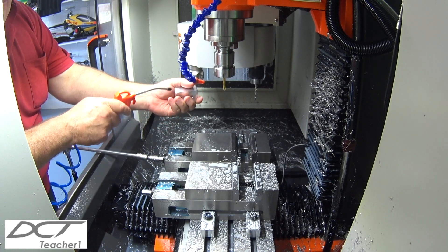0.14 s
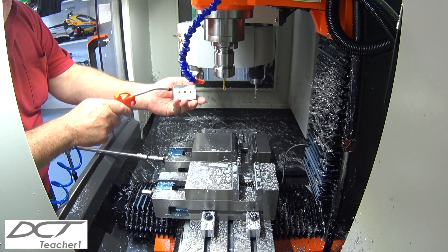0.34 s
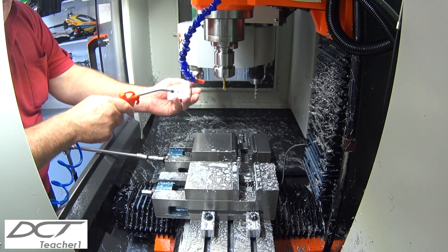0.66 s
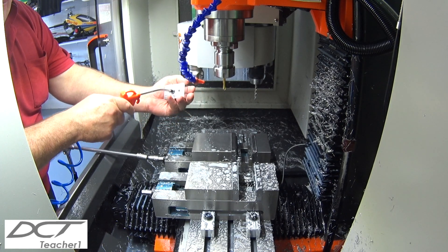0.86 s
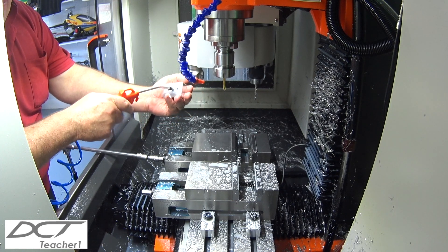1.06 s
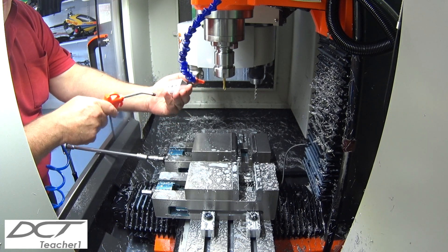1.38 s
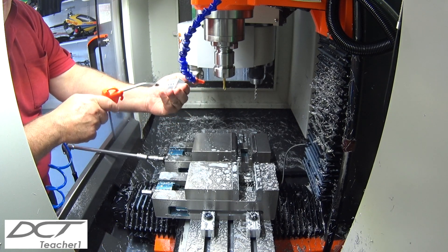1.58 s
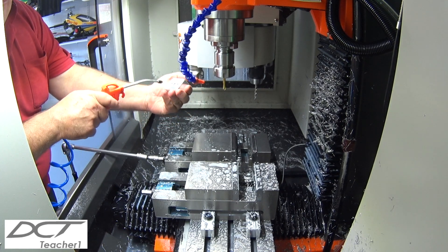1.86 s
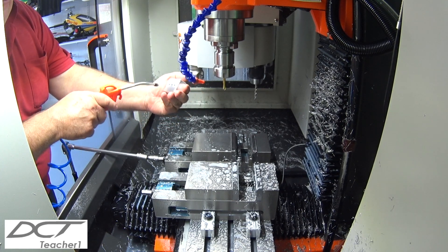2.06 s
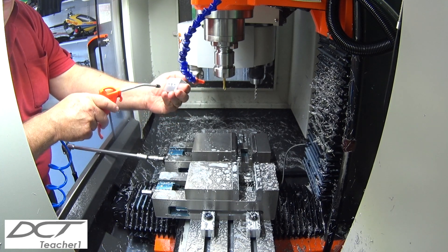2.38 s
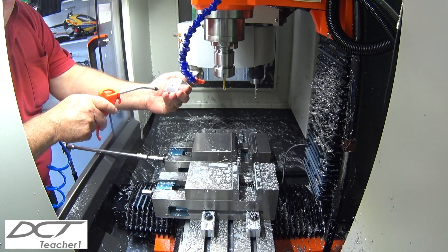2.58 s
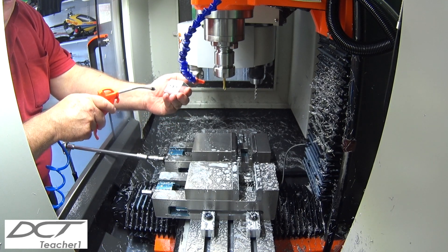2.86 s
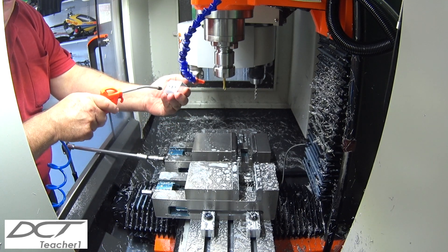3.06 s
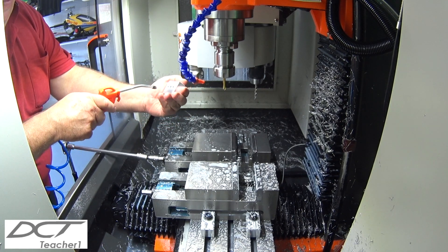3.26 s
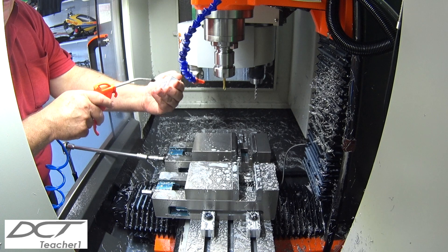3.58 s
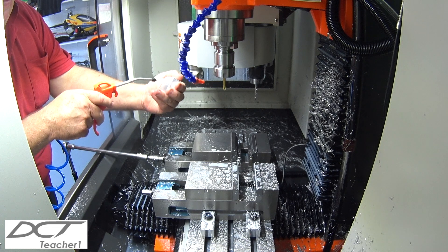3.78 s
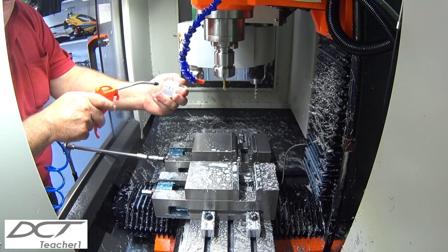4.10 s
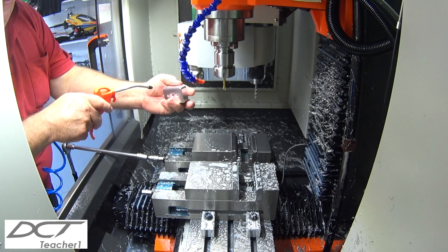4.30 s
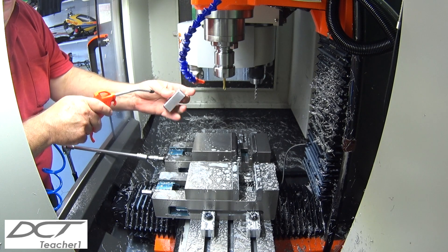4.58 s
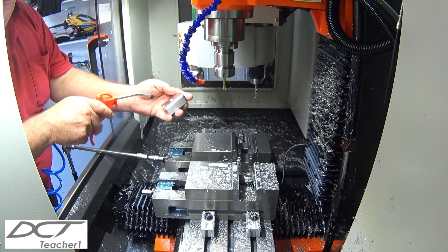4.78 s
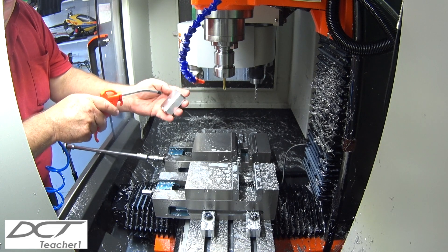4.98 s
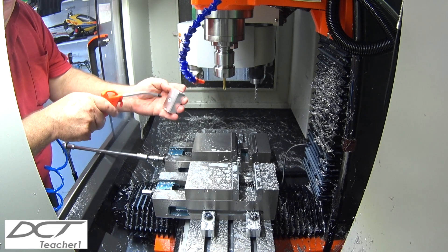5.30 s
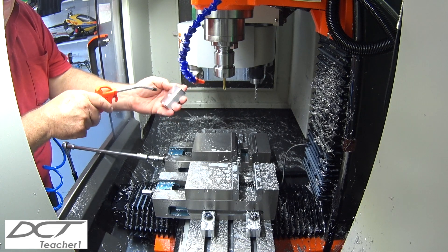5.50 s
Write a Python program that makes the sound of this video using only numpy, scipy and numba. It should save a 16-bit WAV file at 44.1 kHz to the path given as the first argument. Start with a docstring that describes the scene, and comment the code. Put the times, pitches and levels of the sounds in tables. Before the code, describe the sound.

A compressed-air gun blows off a small drilled metal part in one long, bright hiss, broken by quick high whistles and low puffs of wind on the microphone. It cuts off, and the hum of an idle milling machine swells up. A brief burst follows, then a longer pause and a final hiss. The air sounds close, with a short ring from the steel cabinet and workshop.

```python
"""Hissing, whistling blasts of air, one long and two short, over the hum of an idle milling machine.
A blow gun clears a small drilled part in the machine's open door. The turbulent jet hisses, sizzles on
edges, whistles when it catches a bore and buffets the hand; the steel cabinet and the shop ring briefly.
Motors and fans make the hum. A cased camera cuts its gain in each blast, then lets the hum swell back."""
import sys
import numpy as np
from scipy import signal
from scipy.fft import rfft, irfft
from scipy.io import wavfile
from scipy.ndimage import uniform_filter1d
from numba import njit

SR = 44100
rng = np.random.default_rng(int(sys.argv[2]) if len(sys.argv) > 2 else 0)


def persist_wave(psi):
    """Save psi, clipped to +-1, as 16-bit WAV."""
    counts = np.round(np.clip(psi, -1, 1) * 32767).astype(np.int16)
    wavfile.write(sys.argv[1], SR, np.atleast_2d(counts).T)


N = 249165
TIME_S = np.arange(N) / SR
FREQS_HZ = np.maximum(np.arange(N // 2 + 1) * SR / N, 1)

# Trigger pulls. Each row: valve opens, starts to close, closing time, all in seconds.
PULLS = [(-.1, 2.185, .03), (3.018, 3.33, .035), (5.031, 5.8, .03)]
# Turning of the part, one list per pull. Each row: time in seconds, then in relative dB hiss, sizzle,
# spray against sizzle, palm ring against hiss.
TURNING = [
    [(0, -27, -34, -7, -11), (.3, -23.5, -28.5, -8.5, -11.5), (.34, -25.5, -27, -9.5, -11),
     (.45, -30.5, -27, -12, -5), (.64, -28, -23, -8.5, -10.5), (.88, -27, -26.5, -4, -10.5),
     (1.07, -29, -27.5, -3.5, -8), (1.2, -29.5, -30, -9.5, -5.5), (1.47, -28.5, -28, -10.5, -2.5),
     (1.85, -27.5, -32.5, -12, -7.5), (1.97, -29, -30.5, -12.5, -3.5), (2.18, -29.5, -28, -18, -7.5)],
    [(3.03, -33, -37, -19.5, -8.5), (3.06, -34, -36.5, -13.5, 0), (3.13, -34.5, -24.5, -12.5, -3.5),
     (3.22, -27, -26.5, -19, -9), (3.33, -27.5, -30, -14, -7)],
    [(5.04, -29.5, -37, -11, -17), (5.2, -26.5, -27, -7, -10.5), (5.3, -29, -30.5, -7.5, -13),
     (5.44, -22, -31, -8.5, -11.5), (5.65, -16.5, -24, -6.5, -8.5)],
]
# Jet crossing a hole. Each row: start and end in seconds, first and last pitch in Hz, depth 0-1,
# then ring, buffeting and microphone thump in relative dB.
CROSSINGS = [ (.205, 0.262, 5250, 5250, 0.08, -26, -49.5, -68),
             (.312, 0.342, 5200, 5290, 0.74, -16, -40.5, -37.5),
             (0.355, 0.397, 5290, 5200, 0.12, -21, -43, -48.5),
             (0.464, 0.548, 5300, 5300, 0, -21.5, -50.5, -60.5),
             (.65, 0.721, 5336, 5240, 0.74, -18, -43.5, -44),
             (0.719, 0.779, 5220, 5115, 1, -14.5, -46, -43),
             (.785, 0.852, 5158, 5070, 0.82, -16.5, -50.5, -56.5),
             (1.095, 1.12, 5120, 5330, 0.8, -14, -47, -44.5),
             (1.217, 1.266, 5255, 5010, 0.6, -17, -48, -61),
             (1.271, 1.33, 5330, 5280, 0.6, -17, -50, -47.5),
             (1.38, 1.413, 5285, 5220, .45, -20, -47.5, -60.5),
             (1.49, 1.512, 5250, 5220, 0.5, -19.5, -45, -56),
             (1.597, 1.639, 5120, 5160, 0.33, -21.5, -51, -68.5),
             (1.748, 1.796, 5380, 5220, .45, -20.5, -47, -52),
             (1.877, 1.932, 5280, 5150, 0.46, -22, -47, -51),
             (2.006, 2.065, 5280, 5170, 0.56, -19, -44.5, -44.5),
             (2.105, 2.185, 5257, 5080, .25, -17.5, -43.5, -47),
             (3.014, 3.118, 5086, 5370, 0.41, -23, -55.5, -57),
             (3.19, 3.293, 5190, 5160, 0.33, -21, -43.5, -49),
             (3.305, 3.363, 5150, 5170, 0.08, -20.5, -53.5, -58),
             (5.195, 5.234, 5020, 4860, 0.2, -27, -47, -65), ]
# Jet grazing an edge. Each row: centre and half length in seconds, sizzle lift and buffeting in dB.
GRAZES = [(.585, 0.03, 6, -39.5), (0.638, .02, 0.5, -54), (1.32, 0.0069, 11, -41.5),
          (1.643, 0.017, 8, -58.5), (3.141, 0.045, 0, -49.5), (5.294, 0.038, 4.5, -50),
          (5.55, 0.016, 7, -58)]
# Jet slipping past the part. Each row: centre and half length in seconds, level change in dB.
SLIPS = [(0.418, .016, -2), (1.126, 0.022, -11.5), (1.693, 0.023, -7)]
# Ring of the camera case. Each row: time in seconds, level against the hiss in dB.
CASE_RING_DB = [(0, -18), (.3, -17.5), (.65, -17), (1, -18), (1.47, -17.5), (2.18, -23), (3.03, -19),
                (3.33, -25), (5.05, -17.5), (5.25, -21), (5.65, -17.5)]
# Motor tones; the lowest two beat at 8 Hz. Each row: frequency in Hz, level in dB.
MOTOR_TONES = [(91.7, -53), (99.7, -55.5), (142.6, -53.5), (168, -74), (199.4, -60), (211, -67), (242, -64),
               (253, -61), (438, -69), (618, -68.5), (698, -69), (717, -77), (817.5, -59)]
# Fan noise. Each row: time in seconds, level in dB.
FAN_LEVEL_DB = [(0, -51), (3.6, -47), (4.15, -48), (4.3, -45.5), (5.65, -48)]
# Noise spectra. Each row: frequency in Hz, relative density in dB.
HISS_SPECTRUM = [(500, -34.5), (1050, -25), (1500, -21), (1850, -12), (2250, -20), (2600, 0.5), (3300, 0),
                 (4200, 0.5), (4750, 2.5), (5400, -1.5), (6200, -27), (8000, -39)]
PALM_SPECTRUM = [(1200, -22), (1700, -19.5), (2150, 1.5), (2450, 4), (2750, -6.5), (3800, -48)]
SIZZLE_SPECTRUM = [(1200, -42.5), (1900, -15.5), (3000, -22), (4200, -1), (4800, 5), (5300, -5.5),
                   (5900, 4), (6600, -1), (7500, -15), (8500, -30), (11000, -38.5)]
SPRAY_SPECTRUM = [(5500, -18.5), (7300, 4), (8300, 3.5), (9000, -5), (9800, -9), (11000, -8.5)]
BUFFET_SPECTRUM = [(20, -15), (60, -8.5), (130, 4), (300, 4), (550, 3), (950, 0.5), (1500, -3), (3000, -39)]
THUMP_SPECTRUM = [(20, -13), (45, -8), (80, -0.5), (150, -6.5), (260, -4.5), (500, -33), (1200, -46)]
FAN_SPECTRUM = [(25, -21), (75, -5), (110, -11.5), (200, -3), (320, -6.5), (500, -21), (720, -13),
                (1050, -20), (1700, -15.5), (2200, -16.5), (3000, -17.5), (5000, -18), (6500, -33),
                (8500, -44), (11000, -51.5)]
# Resonances. Each row: centre in Hz, width in Hz, lift in dB.
PALM_MODES = [(2424.5, 82, 10.5)]
CASE_MODES = [(1240, 270, 10), (2800, 150, 2), (3900, 200, 2)]
PANEL_MODES = [(140.5, 30, 15.3), (237.4, 22, 10.2), (1300, 420, 7.3), (2620, 370, 7.5), (3840, 270, 5.9)]
# Stereo width of the near jet and the far machine. Each row: frequency in Hz, side gain in dB.
JET_WIDTH = [(60, -6), (200, -8.5), (550, -1.5), (1100, -1), (1900, -8), (3400, -8.5), (4500, -28),
             (5400, -22), (6500, -8), (10000, -9.5)]
HUM_WIDTH = [(60, -29.5), (150, -21), (340, -14), (600, -4.5), (820, -1.5), (1100, -6), (1900, -8.5),
             (3400, -10), (6000, -33), (10000, 5.5)]


def jet(in_hole, flutter_db=1.65, hole_db=-11, case_hole_db=-8, palm_hole_db=-6.5):
    """Turbulent hiss, weaker over a hole; stray air rings the palm's hollow and the camera case."""
    level_db, _, _, palm_db = curves(*TURNING)
    case_db, = curves(CASE_RING_DB)
    hiss = noise(HISS_SPECTRUM, CASE_MODES) * undb(flutter_db * walk(70))
    case = band(centre_hz=1355, width_hz=150) * undb(case_db + case_hole_db * in_hole + 2 * walk(30))
    palm = noise(PALM_SPECTRUM, PALM_MODES) * undb(palm_db - .5 + palm_hole_db * in_hole)
    return (hiss + case + palm) * undb(level_db + hole_db * in_hole)


def edges(in_hole, flutter_db=1.74, hole_db=-9):
    """Air split by sharp edges sizzles, louder at a graze, weaker in a deep crossing."""
    _, level_db, spray_db, _ = curves(*TURNING)
    graze_db = sum(lift_db * swell(centre_s, half_s) for centre_s, half_s, lift_db, _ in GRAZES)
    sizzle = noise(SIZZLE_SPECTRUM) * undb(1 + graze_db)
    spray = noise(SPRAY_SPECTRUM) * undb(spray_db)
    return (sizzle + spray) * undb(level_db + hole_db * in_hole ** 2 + flutter_db * walk(70))


def bores(in_hole, centre_hz=5190, width_hz=640):
    """Turbulence rings the drilled holes: faintly from stray air, loudly in a shallow crossing."""
    _, sizzle_db, _, _ = curves(*TURNING)
    crossed = sum(undb(ring_db) * np.sqrt(1 - depth) * inside(start_s, end_s)
                  for start_s, end_s, _, _, depth, ring_db, *_ in CROSSINGS)
    stray = undb(sizzle_db - 1) * (1 - in_hole)
    return band(centre_hz, width_hz) * np.hypot(crossed, stray)


def whistles(octave_db=-36):
    """Edge tones bend faster as the jet slides off a hole; the deeper the crossing, the purer."""
    wobble = .03 * walk(400)
    flutter_db = walk(120)
    drift = .004 * walk(90)
    out = np.zeros(N)
    for start_s, end_s, first_hz, last_hz, depth, ring_db, *_ in CROSSINGS:
        gate = inside(start_s, end_s)
        on = gate > 0
        progress = np.interp(TIME_S[on], [start_s, end_s], [0, 1])
        pitch_hz = first_hz + (last_hz - first_hz) * progress ** 2
        pitch_hz *= 1 + (1 - depth) * wobble[on] + drift[on]
        phase = 2 * np.pi * np.cumsum(pitch_hz) / SR
        tone = np.sin(phase) + undb(octave_db) * np.sin(2 * phase)
        out[on] += undb(ring_db) * np.sqrt(depth) * gate[on] * tone
    return np.sqrt(2) * out * undb(flutter_db)


def valve(opening_s=.018):
    """Air flow 0-1: snaps open, closes more slowly."""
    return sum(np.clip((TIME_S - on_s) / opening_s, 0, 1) ** 3
               * np.clip(1 - (TIME_S - off_s) / closing_s, 0, 1) for on_s, off_s, closing_s in PULLS)


def hole_share(slide_share=.71):
    """Share 0-1 of the jet that goes down a hole; slow crossings fade slowly."""
    shares = (depth * inside(start_s, end_s, slide_share * (end_s - start_s))
              for start_s, end_s, _, _, depth, *_ in CROSSINGS)
    return np.clip(sum(shares), 0, 1)


def striking(rim_lift_db=1.5, lead_s=.015):
    """Relative force on the part: up on the rim before each hole, down when the jet slips past."""
    rim_db = rim_lift_db * sum(swell(start_s - lead_s, half_s=.018) for start_s, *_ in CROSSINGS)
    slip_db = sum(db * swell(centre_s, half_s) for centre_s, half_s, db in SLIPS)
    return undb(rim_db + slip_db)


def buffet(steady_db=-62, flutter_db=2):
    """The hand sheds low eddies as air comes through a hole or round an edge; mid and side."""
    through = sum(undb(db) * inside(start_s, end_s) for start_s, end_s, *_, db, _ in CROSSINGS)
    around = sum(undb(db) * swell(centre_s, half_s) for centre_s, half_s, _, db in GRAZES)
    eddies = np.array([noise(BUFFET_SPECTRUM) for _ in range(2)])
    return eddies * np.hypot(undb(steady_db), through + around) * undb(flutter_db * walk(60))


def gusts(travel_s=.006, graze_db=-6):
    """Crossings and grazes send deep puffs of wind to the microphone, alike at both ports."""
    from_holes = sum(undb(db) * swell((start_s + end_s) / 2 + travel_s, (end_s - start_s) / 2)
                     for start_s, end_s, *_, db in CROSSINGS)
    from_edges = sum(undb(db + graze_db) * swell(centre_s, half_s) for centre_s, half_s, _, db in GRAZES)
    return noise(THUMP_SPECTRUM) * (from_holes + from_edges)


def cabinet(x, steel_t60_s=.13, steel_db=-4, shop_t60_s=.5, shop_db=-12, shop_cutoff_hz=6500):
    """Direct sound, quick steel cabinet reflections and the shop's longer, duller ring; mid and side."""
    t_s, out = TIME_S[:SR], []
    lowpass = signal.butter(2, shop_cutoff_hz, fs=SR, output="sos")
    for direct in (1, 0):  # no direct sound in the side
        steel, shop = (rng.standard_normal(SR) * undb(-60 * t_s / t60_s) * (t_s > .002)
                       for t60_s in (steel_t60_s, shop_t60_s))
        shop = signal.sosfilt(lowpass, shop / np.linalg.norm(shop))
        response = undb(steel_db) * steel / np.linalg.norm(steel) + undb(shop_db) * shop
        response[0] = direct
        out.append(signal.fftconvolve(x, response / np.linalg.norm(response))[:N])
    return np.array(out)


def machine(drift_hz=.2, swell_db=.64):
    """Motor tones over fan noise that booms in the panels; mid and side."""
    fan_db, = curves(FAN_LEVEL_DB)
    fans = np.array([noise(FAN_SPECTRUM, PANEL_MODES + CASE_MODES) for _ in range(2)])
    fans *= undb(fan_db + swell_db * walk(12))
    motors = np.zeros((2, N))
    for hz, db in MOTOR_TONES:
        cycles = np.cumsum(hz + drift_hz * walk(4.31)) / SR
        offsets = rng.random((2, 1))  # standing waves: mid and side differ in phase
        motors += undb(db) * np.sin(2 * np.pi * (cycles + offsets))
    return fans + np.sqrt(2) * motors


def ports(mid, side, width, left_db=-.5):
    """Left and right at two closely spaced microphone ports."""
    side = colour(side, width)
    return np.array([(mid + side) * undb(left_db / 2), (mid - side) * undb(-left_db / 2)])


def undb(db):
    """Decibels to gain."""
    return 10 ** (np.asarray(db) / 20)


def unit(x):
    """Scale to rms 1."""
    return x / np.sqrt(np.mean(x ** 2))


def curves(*tables):
    """Each column interpolated over the times in the first."""
    times_s, *columns = np.vstack(tables).T
    return [np.interp(TIME_S, times_s, column) for column in columns]


def inside(start_s, end_s, slide_s=.012):
    """Gate 0-1 of one crossing: slides in, holds, slides out."""
    return np.clip(np.minimum(TIME_S - start_s, end_s - TIME_S) / slide_s + .5, 0, 1)


def swell(centre_s, half_s):
    """Bell curve, 1 at its centre."""
    return np.exp(-((TIME_S - centre_s) / half_s) ** 2)


def walk(rate_hz):
    """Smooth random wander of rms 1."""
    step = max(int(SR / rate_hz), 1)
    held = np.repeat(rng.standard_normal(N // step + 1), step)[:N]
    return unit(uniform_filter1d(uniform_filter1d(held, step), step))


def colour(x, spectrum, modes=()):
    """Filter by a smooth spectrum plus resonant humps."""
    hz, db = np.transpose(spectrum)
    gain_db = np.interp(np.log(FREQS_HZ), np.log(hz), db)
    for centre_hz, width_hz, lift_db in modes:
        gain_db += lift_db / (1 + (2 * (FREQS_HZ - centre_hz) / width_hz) ** 2)
    return irfft(rfft(x) * undb(gain_db), N)


def noise(spectrum, modes=()):
    """Coloured noise of rms 1."""
    return unit(colour(rng.standard_normal(N), spectrum, modes))


def band(centre_hz, width_hz):
    """Noise of rms 1 in one steep-sided resonance."""
    gain = 1 / (1 + (2 * (FREQS_HZ - centre_hz) / width_hz) ** 4)
    return unit(irfft(rfft(rng.standard_normal(N)) * gain, N))


@njit
def ducking(excess_db, attack_s, release_s, cut_db):
    """Gain cut in dB: rises from cut_db to meet each excess, then ebbs."""
    out = np.empty(len(excess_db))
    for i in range(len(excess_db)):
        if excess_db[i] > cut_db:
            cut_db += (excess_db[i] - cut_db) / (attack_s * SR)
        else:
            cut_db -= cut_db / (release_s * SR)
        out[i] = cut_db
    return out


def scene(blast_db=14):
    """Three blasts over the idle machine; left and right."""
    flow = valve() * undb(blast_db)
    in_hole = hole_share()
    air = striking() * (jet(in_hole) + edges(in_hole) + bores(in_hole)) + whistles()
    blasts = cabinet(flow * air) + flow * buffet()
    return ports(*blasts, JET_WIDTH) + flow * gusts() + ports(*machine(), HUM_WIDTH)


def record(dry, ceiling_db=-13, limit_db=-11.5, cutoff_hz=11030):
    """The camera's slow gain control ducks each blast, a quick limiter holds peaks, the top is cut."""
    peak_db = 20 * np.log10(np.abs(dry).max(axis=0) + 1e-9)
    slow_db = ducking(peak_db - ceiling_db, attack_s=.0031, release_s=.75, cut_db=9.)
    quick_db = ducking(peak_db - slow_db - limit_db, attack_s=2 / SR, release_s=.011, cut_db=0.)
    lowpass = signal.ellip(12, .2, 80, cutoff_hz, fs=SR, output="sos")
    return signal.sosfilt(lowpass, dry * undb(-slow_db - quick_db))


dry = scene()
out = record(dry)
persist_wave(out)
```